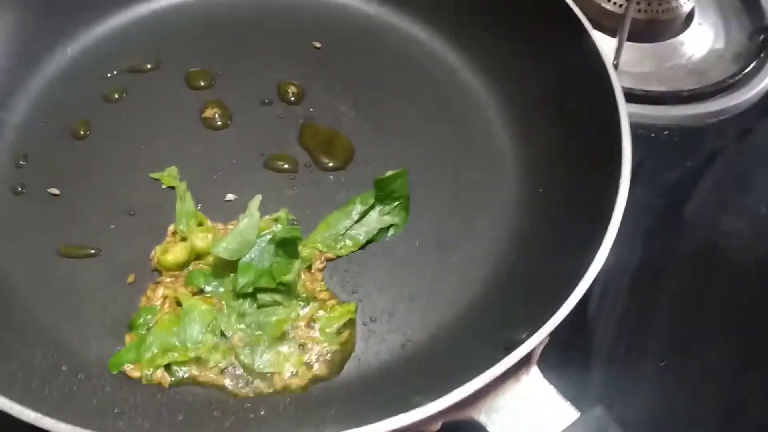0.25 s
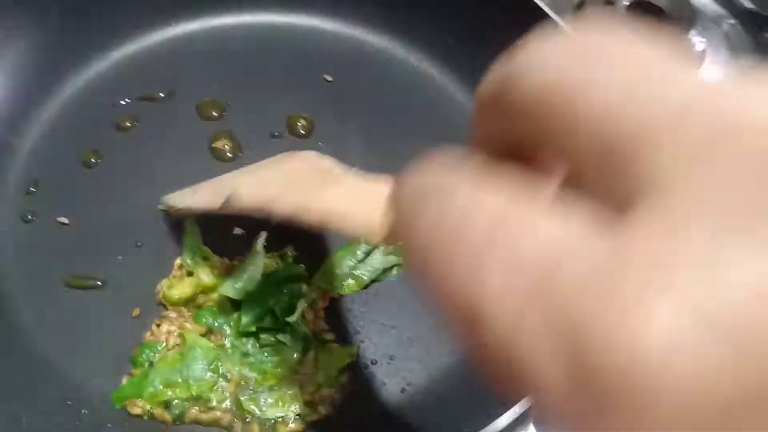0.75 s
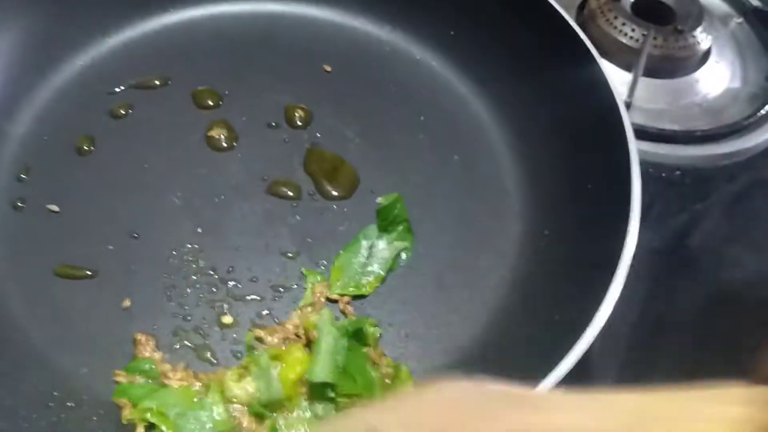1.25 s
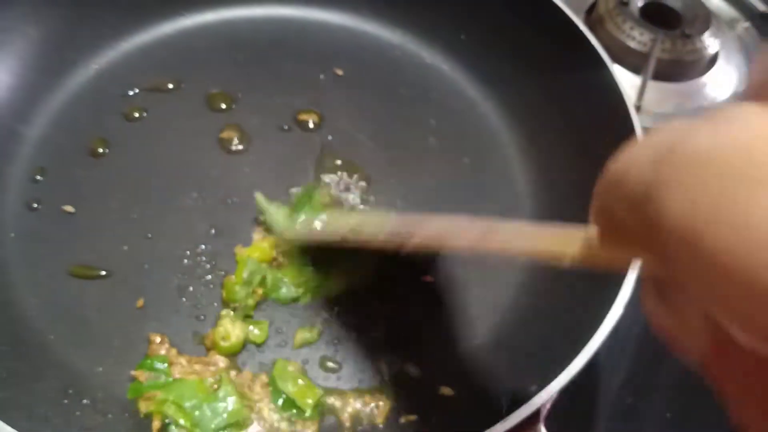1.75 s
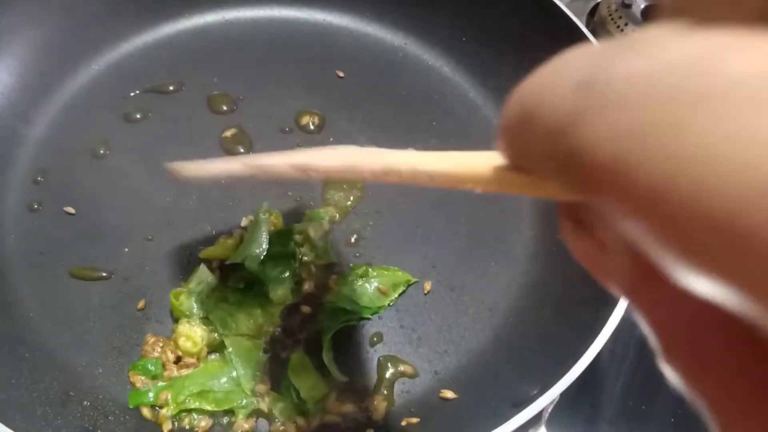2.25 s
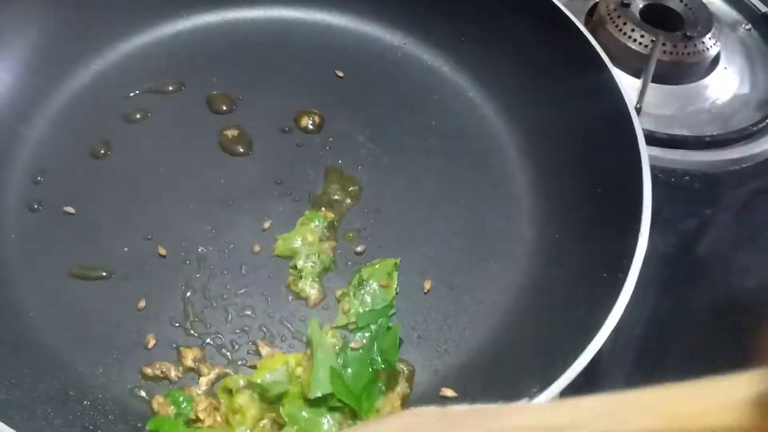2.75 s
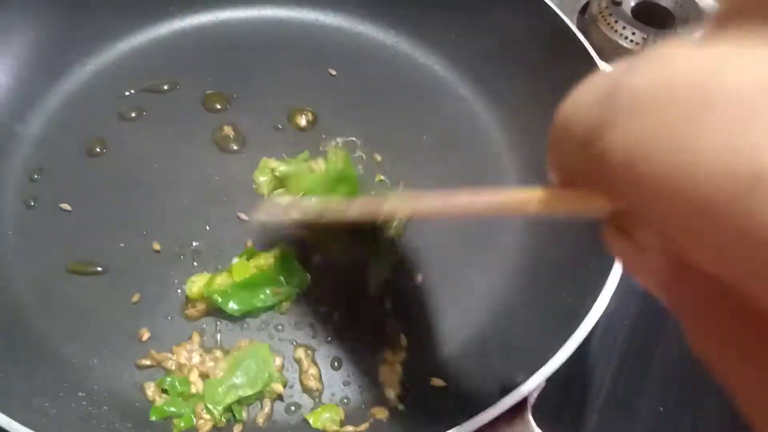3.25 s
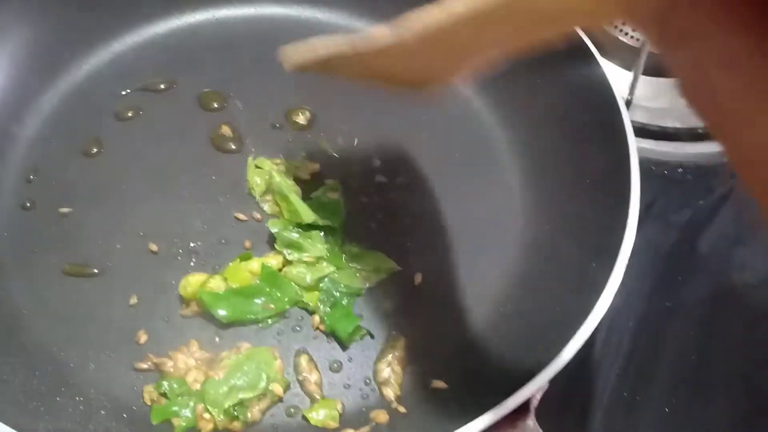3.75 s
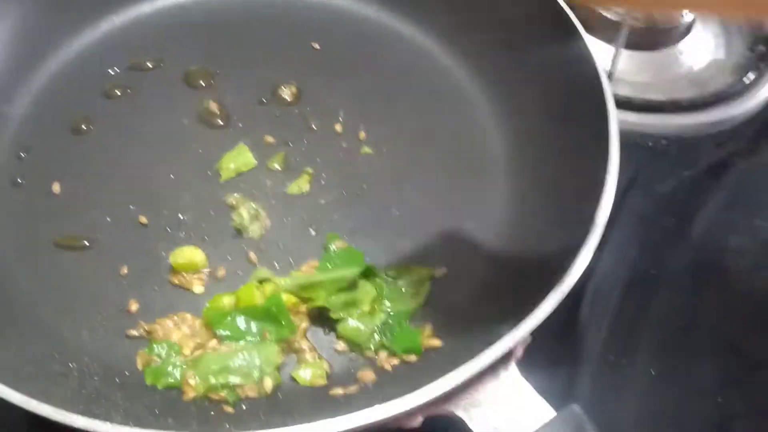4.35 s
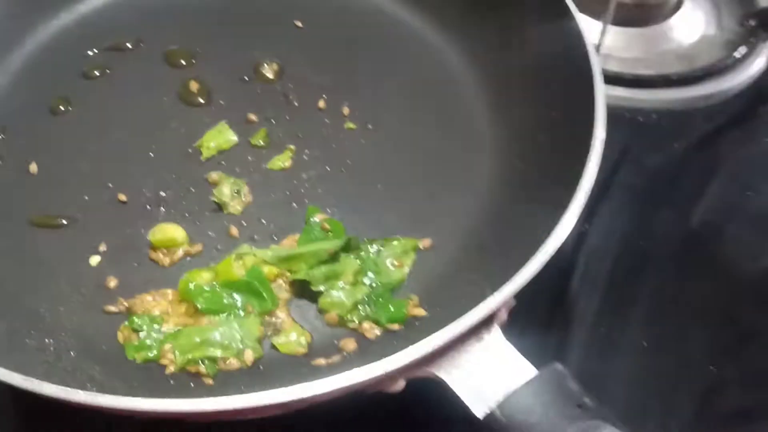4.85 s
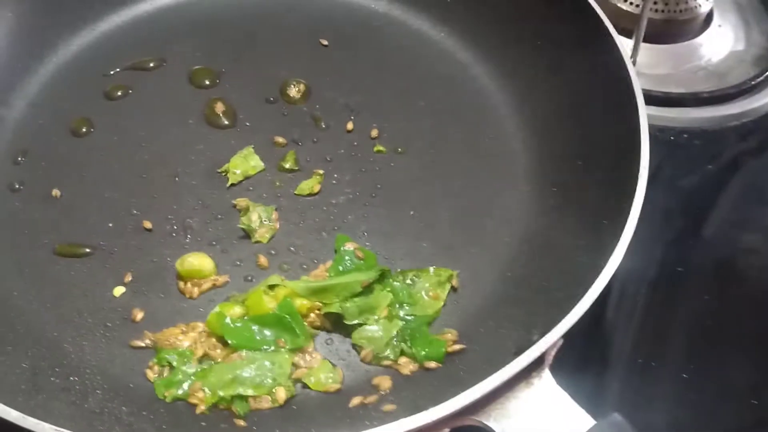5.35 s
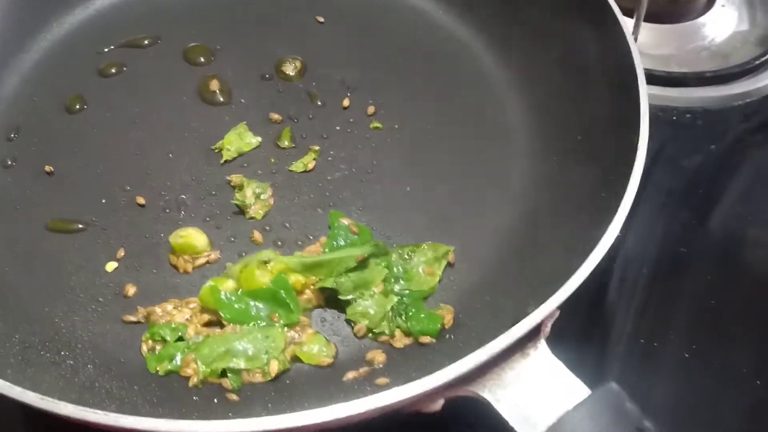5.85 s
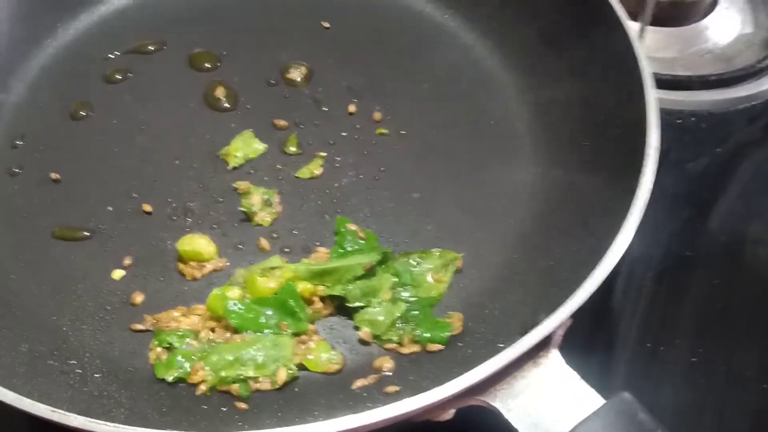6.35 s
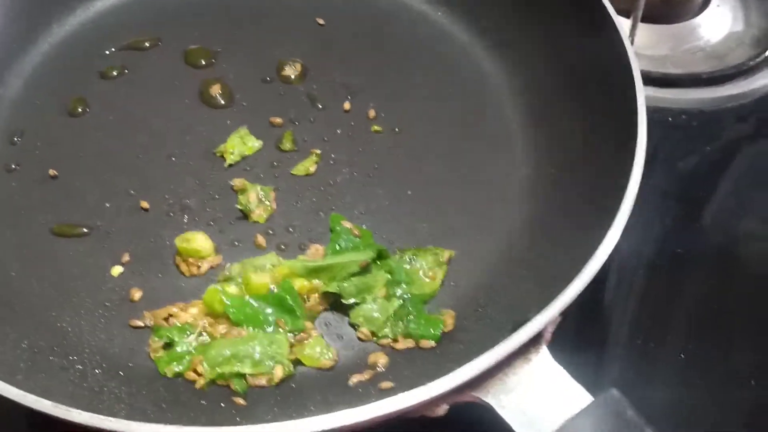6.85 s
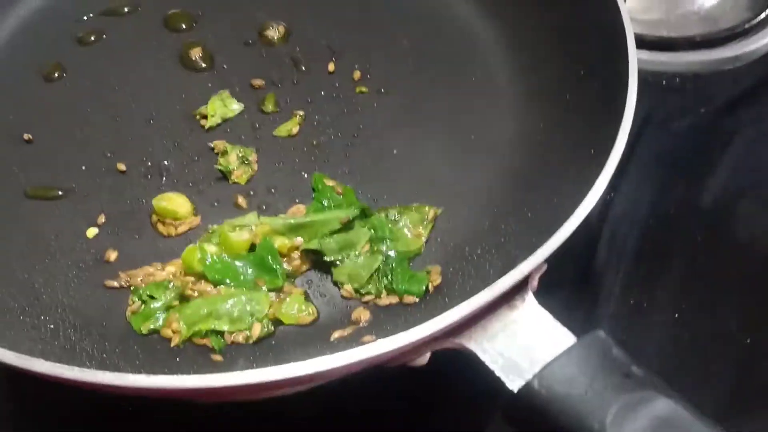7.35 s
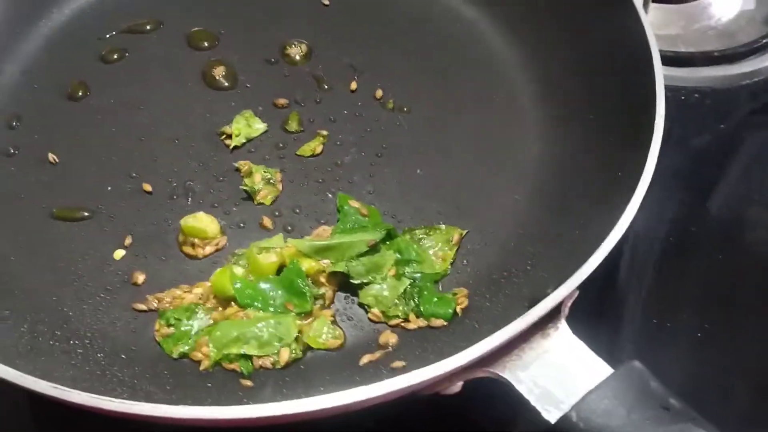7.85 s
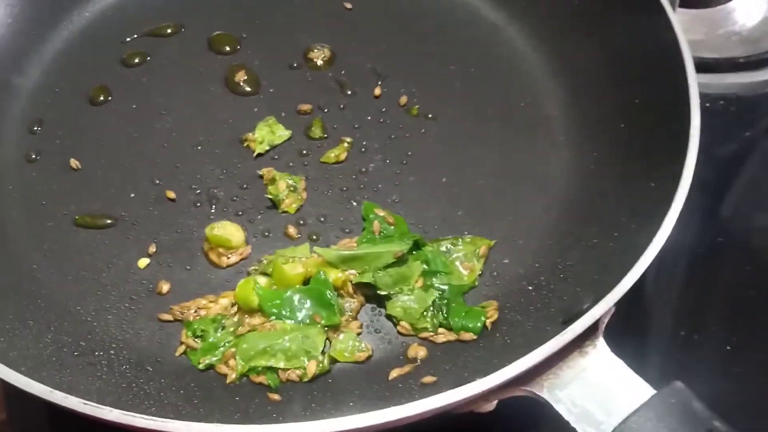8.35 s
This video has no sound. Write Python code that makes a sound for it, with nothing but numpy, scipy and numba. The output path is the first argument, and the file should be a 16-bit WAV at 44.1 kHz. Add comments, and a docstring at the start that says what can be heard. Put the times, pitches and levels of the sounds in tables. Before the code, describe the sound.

Wet leaves and spices fry in a little hot oil, making a dense, crackling sizzle dotted with sharp pops and thin, high spits. The hiss swells in flurries as the food is stirred through the first half, with a few dull little thumps on the left. Then it settles and keeps spluttering. The microphone is close to the pan, with a faint kitchen rumble underneath.

```python
"""A dense, crackling sizzle, close up: wet leaves and spices fry in a little hot oil as a spatula stirs.
Steam bubbles burst by the thousand, in flurries, each a damped oscillation smeared by the pan's bowl.
Bigger bubbles pop and droplets spit, thin and high. Pressure steps thump dully, almost wholly at the
left port of a phone's microphone, and a faint rumble of flame and kitchen lies under it all."""
import sys
import numpy as np
from scipy import signal
from scipy.fft import rfft, irfft
from scipy.io import wavfile
from scipy.ndimage import uniform_filter1d
from numba import njit

SR = 44100
rng = np.random.default_rng(int(sys.argv[2]) if len(sys.argv) > 2 else 0)


def dump(signal):
    """Clip the signal to [-1, 1] and save it as 16-bit WAV at the path in sys.argv[1]."""
    limited = np.clip(np.atleast_2d(signal).T, -1, 1)
    pcm = np.round(limited * 32767).astype(np.int16)
    wavfile.write(sys.argv[1], SR, pcm)


N = 379683

# Level difference between the ports, mostly louder on the left: frequency_hz, left_minus_right_db
PORT_BALANCE = [(60, -14), (110, 4), (200, -0.5), (380, 5), (700, 3), (1290, 3), (2380, 7.5), (4400, 3.5),
                (8120, -0.5), (15000, 7)]


def undb(db):
    """Decibels to amplitude ratio."""
    return 10 ** (np.asarray(db) / 20)


def level(x, db):
    """Scales a signal to an RMS level."""
    return x * undb(db) / np.sqrt(np.mean(x ** 2))


def over_time(rows):
    """Linear interpolation of (time_s, value) points at every sample."""
    return np.interp(np.arange(N) / SR, *np.transpose(rows))


def over_pitch(rows, hz):
    """Interpolation of (frequency_hz, level_db) points on a log-frequency axis."""
    points_hz, db = np.transpose(rows)
    return np.interp(np.log(hz), np.log(points_hz), db)


def flicker(rate_hz):
    """Slow random modulation: Gaussian values, each held for 1 / rate_hz, smoothed twice."""
    hold = int(SR / rate_hz)
    steps = np.repeat(rng.standard_normal(N // hold + 1), hold)
    return uniform_filter1d(uniform_filter1d(steps, hold), hold)[:N]


def minimum_phase(db_at, size=4096):
    """Folding the cepstrum turns a dB response into a causal impulse response."""
    hz = np.maximum(np.arange(size // 2 + 1), 1) * SR / size
    cepstrum = irfft(db_at(hz) * np.log(10) / 20)
    cepstrum[1:size // 2] *= 2
    cepstrum[size // 2 + 1:] = 0
    return irfft(np.exp(rfft(cepstrum)))


@njit
def damped_sines(n, start_sample, cycles_per_sample, decay_cycles, amplitude):
    """Superposed free oscillations, each falling to 1/e in its decay_cycles."""
    out = np.zeros(n)
    for k in range(len(start_sample)):
        pole = cycles_per_sample[k] * (2j * np.pi - 1 / decay_cycles[k])
        first = int(start_sample[k]) + 1
        end = first + int(6 * decay_cycles[k] / cycles_per_sample[k]) + 1
        phasor, step = amplitude[k] * np.exp(pole * (first - start_sample[k])), np.exp(pole)
        for j in range(max(first, 0), min(n, end)):
            out[j] += phasor.imag
            phasor *= step
    return out


def bursts(n, start_s, hz, cycles, amplitude, balance_db, lead_ms=0.05, spread_ms=0.043):
    """Path difference: bursts from scattered spots tend to reach the right port first."""
    lead_s = (lead_ms + spread_ms * rng.standard_normal(len(start_s))) / 1000
    left = damped_sines(n, start_s * SR, hz / SR, cycles, amplitude * undb(balance_db / 2))
    right = damped_sines(n, (start_s - lead_s) * SR, hz / SR, cycles, amplitude * undb(-balance_db / 2))
    return np.array([left, right])


def bowl_scatter(x, tail_db, t60_s=0.065):
    """Scattering in the pan's bowl adds a short diffuse tail, different at each port."""
    t = np.arange(int(0.04 * SR)) / SR
    tail = rng.standard_normal((2, len(t))) * np.exp(-t * np.log(1000) / t60_s) * (t > 0.0003)
    tail /= np.linalg.norm(tail, axis=1, keepdims=True)
    return x + undb(tail_db) * signal.oaconvolve(x, tail, axes=1)[:, :x.shape[1]]


def port_responses():
    """Filters in series add in dB: pan, microphone and port give one impulse response a side."""
    # Colour of pan and microphone: frequency_hz, gain_db
    colour = [(120, -33), (200, -22), (440, -21), (560, -16.5), (980, -13), (1270, -17.5), (1750, -10.5),
              (2250, -4.5), (2950, -4), (3150, -7), (3350, -6.5), (3650, -6.5), (4000, -4), (4400, -6),
              (5900, -2.5), (7600, -14), (9130, -15), (9820, -21), (11400, -11.5), (15000, -5.5),
              (15470, 2.5), (15560, -14), (15800, -11)]
    # Broad resonances of the bowl: centre_hz, width_hz, gain_db
    resonances = [(1706, 390, 4), (5290, 1400, 2)]

    def gain_db(f, side):
        peaks_db = sum(db / (1 + (2 * (f - hz) / width) ** 2) for hz, width, db in resonances)
        return over_pitch(colour, f) + peaks_db + side * over_pitch(PORT_BALANCE, f) / 2
    return np.array([minimum_phase(lambda f: gain_db(f, side)) for side in (1, -1)])


def rumble():
    """Flame and kitchen murmur as low-frequency noise, largely coherent between the ports."""
    # Spectral density of the murmur: frequency_hz, relative_db
    spectrum = [(24, -28), (55, -18), (85, -1), (150, 0), (240, -5), (420, -12), (545, -5), (700, -20),
                (1320, -60)]
    # Slow course of its loudness: time_s, relative_db
    course = [(0.0, -62.5), (8.18, -57), (8.61, -72)]
    response = minimum_phase(lambda f: over_pitch(spectrum, f))
    common, left, right = (signal.oaconvolve(rng.standard_normal(N), response)[:N] for _ in range(3))
    murmur = np.array([common + 0.067 * left, common + 0.18 * right])
    return level(murmur * undb(2.5 * flicker(13)), 1.4) * undb(over_time(course))


def thumps(count=400, size=512):
    """Pressure steps at the left port leak away exponentially; the microphone's low cut swings them back."""
    # The strongest steps: start_s, relative_db, polarity (push +1, pull -1), leak_ms
    strong = [(0.0706, -10, -1, 0.13), (0.215, -15, -1, 0.19), (0.4153, -10, -1, 0.12),
              (0.5064, -8, -1, 0.096), (0.5245, -11.5, -1, 0.31), (0.5368, -13, -1, 0.15),
              (1.23, -8, -1, 0.11), (1.2392, -10, -1, 0.12), (1.3805, -11, 1, 0.49),
              (1.4742, -11, -1, 0.13), (1.6163, -14, -1, 0.15), (1.6398, -5.5, -1, 0.12),
              (1.8503, -1.5, 1, 0.54), (1.8684, -4, -1, 0.45), (1.9436, -17, 1, 0.2),
              (1.9558, -9.5, 1, 0.21), (2.1165, -1, 1, 0.77), (2.2947, -8, -1, 0.12),
              (2.3487, -10, -1, 0.18), (2.3989, -7, -1, 0.27), (2.473, -5, -1, 0.42),
              (2.5474, -14, -1, 0.25), (2.6516, -12, -1, 0.14), (2.697, -16, -1, 0.15),
              (2.8926, -13, -1, 0.15), (2.9178, -9, -1, 0.11), (3.0453, -8, -1, 0.11),
              (3.1986, -7, -1, 0.13), (3.7527, -10.5, 1, 0.39), (3.7719, -16, 1, 0.2),
              (3.7769, -11, 1, 0.2), (3.7853, -15, -1, 0.15), (3.8137, -0.5, -1, 0.71),
              (4.0345, -3, 1, 0.94), (4.0448, -3.5, 1, 0.62), (4.0588, -13, -1, 0.28),
              (3.9336, -13, -1, 0.14), (4.2754, -14, -1, 0.15), (4.4168, -11, -1, 0.098),
              (5.1443, -13, -1, 0.13), (5.1545, -10, -1, 0.079), (5.1738, -9, -1, 0.074),
              (5.5042, -6, -1, 0.089), (5.7596, -11, -1, 0.12), (5.8111, -12, -1, 0.12),
              (6.1816, -11, -1, 0.17), (6.3485, -5, -1, 0.06), (6.358, -7, -1, 0.1),
              (6.4845, -10, -1, 0.16), (6.4917, -14.5, -1, 0.13), (7.2028, -12, -1, 0.15),
              (7.2335, -16, -1, 0.22), (8.119, -2.5, -1, 0.11), (8.2288, -8, -1, 0.1)]
    when, strength, polarity = rng.random((count, 3)).T
    faint_db = -38 + np.minimum(-3.8 * np.log(1 - strength), 12)
    faint = np.transpose([when * (N - size) / SR, faint_db, polarity - 0.8, np.full(count, 0.3)])
    t_ms = np.arange(size) / SR * 1000
    steps = np.zeros(N + size)
    for start_s, db, push, leak_ms in np.vstack([strong, faint]):
        i = int(start_s * SR)
        # quick steps spring back, so they carry less bass
        rebound = np.clip(1.6 - 4.54 * leak_ms, 0, 1) * leak_ms / 1.5 * np.exp(-t_ms / 1.2)
        steps[i:i + size] += np.sign(push) * undb(db) * (np.exp(-t_ms / leak_ms) - rebound)
    dull = signal.sosfilt(signal.butter(2, 3200, fs=SR, output="sos"), steps[:N])
    left = signal.sosfilt(signal.butter(3, 60, "high", fs=SR, output="sos"), dull)
    return left * undb([[0], [-32]])


def spits(count=900, top_hz=14700):
    """Spitting droplets tick: damped oscillations of a few cycles near the upper limit of hearing."""
    # The sharpest spits: start_s, relative_db
    strong = [(0.0697, -24), (0.214, -22), (0.3551, -27), (0.413, -30), (0.5062, -30), (0.5242, -23),
              (0.7776, -30), (0.9732, -27), (1.5748, -27), (2.3476, -23), (2.3974, -24), (2.6055, -26),
              (2.6504, -20), (3.043, -21), (3.0964, -30), (3.1976, -25), (3.8122, -32), (4.0582, -23),
              (4.119, -25), (4.6324, -28), (4.6423, -23), (4.996, -27), (5.1427, -26), (5.1746, -23),
              (5.2769, -24), (5.3577, -23), (5.5014, -22), (5.7583, -26), (6.02, -22), (6.1804, -22),
              (6.349, -16), (6.4835, -20), (6.7935, -29), (6.8508, -24), (6.984, -25), (6.9905, -23),
              (7.1262, -22), (7.1681, -27), (7.2325, -24), (7.4245, -27), (7.889, -25), (8.1179, -22),
              (8.1683, -21), (8.2277, -27), (8.337, -30), (8.3484, -26), (8.3584, -23), (8.514, -29)]
    when, strength, pitch = rng.random((count, 3)).T
    faint_db = -42 + np.minimum(-3.5 * np.log(1 - strength), 9)
    start_s, db = np.vstack([strong, np.transpose([when * N / SR, faint_db])]).T
    hz = top_hz * (1 - 0.048 * rng.random(len(db)))
    ticks = bursts(N, start_s, hz, cycles=np.full(len(db), 3.0), amplitude=undb(db + 8), balance_db=12)
    thin = signal.sosfilt(signal.butter(4, 11000, "high", fs=SR, output="sos"), ticks)
    return bowl_scatter(thin, tail_db=-6, t60_s=0.03)


def pops(fry_db, count=750, size=1024):
    """A large bubble's skin tears with a crack and excites a damped oscillation at the bubble's pitch."""
    # The loudest bursts: start_s, peak_db, pitch_hz, decay_cycles
    strong = [(0.025, -9.5, 1660, 0.2), (0.0706, -13.5, 1800.0, 0.34), (0.2144, -18, 3000, 0.18),
              (0.3113, -14, 3000, 0.6), (0.313, -10, 2900.0, 0.42), (0.3136, -9, 3970, 3.3),
              (0.3562, -9.5, 3000.0, 0.2), (0.3676, -10, 2700.0, 0.38), (0.4358, -15, 2600, 0.55),
              (0.525, -12, 1400.0, 0.15), (0.5494, -11, 4200.0, 1.2), (0.556, -12.5, 2500.0, 0.59),
              (0.7807, -9.5, 2900.0, 0.15), (0.9115, -8, 4300.0, 0.22), (0.9741, -9.5, 1370, 0.24),
              (1.1043, -9, 2800.0, 0.2), (1.1898, -10.5, 6000.0, 0.82), (1.207, -12, 2700.0, 0.82),
              (1.2378, -20.0, 5600.0, 0.65), (1.2391, -8, 4000.0, 0.2), (1.2846, -18, 2500.0, 0.2),
              (1.2905, -12.5, 3400.0, 0.94), (1.4995, -14, 2600.0, 0.35), (1.5758, -13, 1600.0, 0.22),
              (1.6757, -7, 3700.0, 0.52), (1.7149, -11.5, 2550, 1.2), (1.8092, -10.5, 2700.0, 0.18),
              (1.8684, -24, 1400.0, 0.27), (2.1164, -21, 1400.0, 0.25), (2.2897, -10, 3700.0, 0.15),
              (2.2947, -5, 5400.0, 0.29), (2.3484, -12, 1500.0, 0.2), (2.3628, -17.0, 3500.0, 0.45),
              (2.6217, -11.5, 5700.0, 1.4), (2.6516, -16, 1600.0, 0.16), (2.8082, -18, 2400.0, 0.2),
              (2.8336, -16.0, 2800.0, 0.9), (3.1093, -15, 3500.0, 0.45), (3.1409, -14, 3100.0, 0.2),
              (3.1857, -15, 2400.0, 0.49), (3.4138, -6.0, 1900.0, 0.2), (3.5601, -7, 2500.0, 0.13),
              (3.708, -12, 2710, 1.1), (3.7416, -10.5, 2720, 0.65), (3.7656, -11, 3100.0, 0.2),
              (3.9115, -29.5, 760.0, 6.7), (3.953, -17, 2900, 1.0), (4.0089, -22, 2300.0, 0.65),
              (4.0185, -13, 2700.0, 0.9), (4.0342, -26, 1400.0, 0.27), (4.5843, -10.5, 5100.0, 0.14),
              (4.6423, -12, 2980, 0.2), (4.8686, -13.5, 2350, 1), (4.9573, -14, 3100.0, 0.2),
              (4.9981, -12, 6000.0, 0.18), (5.0213, -16, 2300.0, 0.24), (5.1549, -15, 1400.0, 0.19),
              (5.1757, -10, 6000.0, 0.2), (5.2468, -11, 6000.0, 0.2), (5.3587, -12, 3600.0, 0.18),
              (5.5021, -10, 6000.0, 0.65), (5.5659, -11, 5600.0, 1.6), (5.6228, -10.5, 2600, 0.22),
              (5.8108, -11, 6000.0, 1.9), (5.9113, -10, 5400.0, 0.9), (5.9251, -13.5, 2600.0, 0.54),
              (5.9337, -12, 3000.0, 0.3), (5.943, -16, 2900.0, 0.2), (5.9682, -12.5, 2800.0, 0.3),
              (6.1012, -16, 2400.0, 0.2), (6.1032, -13.5, 1900.0, 0.2), (6.2948, -9.5, 3220, 0.78),
              (6.3038, -10, 5800.0, 0.66), (6.3488, -10.5, 1400.0, 0.16), (6.4555, -8, 6040, 1.5),
              (6.489, -9, 2680, 0.6), (6.5982, -5.5, 6000.0, 1.1), (6.5999, -13, 5900.0, 0.25),
              (6.6739, -12, 2200.0, 0.22), (6.7586, -23, 2400.0, 1.2), (6.7636, -11.0, 5200.0, 0.22),
              (6.7805, -16.5, 1800.0, 0.34), (6.8321, -4, 2840, 0.57), (6.9459, -10, 3800.0, 0.2),
              (6.9562, -14, 3200.0, 0.58), (6.9663, -13.5, 2350, 1.1), (6.985, -11, 2100.0, 0.3),
              (7.0482, -12, 5400.0, 0.2), (7.1436, -8.5, 2100.0, 0.25), (7.1832, -12, 6000.0, 1.7),
              (7.284, -10, 5100.0, 0.45), (7.3456, -12, 2700.0, 0.2), (7.4254, -18, 2110, 0.65),
              (7.4957, -11, 3200.0, 0.2), (7.5063, -14, 2000.0, 0.56), (7.565, -14, 2800, 0.33),
              (7.6097, -12, 2600.0, 0.43), (7.619, -2, 3900, 0.5), (7.7796, -9, 2700.0, 0.12),
              (7.8046, -14, 3300.0, 0.52), (7.8163, -13, 3050, 1.2), (7.8289, -7.5, 5500.0, 0.85),
              (7.8945, -14, 2800.0, 0.45), (7.8962, -12, 2500.0, 0.18), (7.9308, -18, 2600, 1.1),
              (7.9488, -8, 5200, 0.5), (7.9682, -11.0, 2900.0, 0.16), (8.0215, -10, 4300.0, 0.26),
              (8.0444, -21, 2000.0, 0.82), (8.119, -23, 2260, 0.43), (8.1339, -10, 5000.0, 0.22),
              (8.2302, -12.5, 2400.0, 0.27), (8.249, -18, 2400.0, 0.72), (8.2607, -9.5, 2720, 0.37),
              (8.3592, -18, 900, 0.24), (8.3831, -12, 1400.0, 0.3), (8.4097, -9.5, 2570, 0.8),
              (8.4931, -11, 4500.0, 0.36)]
    crack_hz, crack_cycles, crack_db = 5200, 0.4, -9
    onset_s = 0.0005
    when, strength, pitch, ring = rng.random((count, 4)).T
    at = size + when * (N - 2 * size)
    lesser_db = fry_db[at.astype(int)] + 10.5 + np.minimum(-2.6 * np.log(1 - strength), 5)
    lesser = np.transpose([at / SR, lesser_db, 1900 * 3.0 ** pitch, 0.13 + 0.4 * ring])
    bubbles = np.vstack([strong, lesser])
    balances_db = 5.2 + 4 * (rng.random(len(bubbles)) - 0.5)  # left minus right
    ports = port_responses()[:, :size]
    soften = signal.butter(2, 9500, fs=SR, output="sos")
    out = np.zeros((2, N + size))
    for (start_s, db, hz, cycles), balance_db in zip(bubbles, balances_db):
        modes = np.transpose([(hz, cycles, 1), (crack_hz, crack_cycles, undb(crack_db))])
        source_balance_db = balance_db - over_pitch(PORT_BALANCE, hz)
        burst = bursts(size, np.full(2, onset_s), *modes, source_balance_db, spread_ms=0.015)
        smeared = signal.sosfilt(soften, bowl_scatter(burst, tail_db=-6))
        pop = signal.fftconvolve(smeared, ports, axes=1)[:, :size]
        i = int((start_s - onset_s) * SR)
        out[:, i:i + size] -= pop * undb(db) / np.abs(pop).max(axis=1).mean()
    return out[:, :N]


def stirring(start, stirred, settled):
    """Piecewise-linear course of a value as stirring builds up, stops, and the heap settles near the rim."""
    full_s, stop_s, settle_s = 1.3, 4.24, 0.97
    return over_time([(0, start), (full_s, stirred), (stop_s, stirred), (stop_s + settle_s, settled)])


def sizzle(fry_db, count=30000, spots=6):
    """Shot noise: countless steam bubbles burst at random, the smaller the higher, swelling in flurries."""
    # The bowl's main resonance surges with the spatula's strokes: time_s, gain_db
    ring_gain = [(0, -6), (.9, 3), (1.15, -1), (1.4, -12), (1.72, 5), (1.9, -1), (2.5, 5), (2.9, 2.5),
                 (3.35, 3.5), (3.6, -0.5), (3.76, 3), (3.85, 1), (4.05, 1), (4.3, 1), (5, -0.5), (8.61, -7)]
    # Borders between big, medium, small and finest bubbles: pitch_hz
    borders = [1380, 3860, 9980]
    spread_db, flicker_db = [3.05, 4.2, 3.18, 1.64], [3.4, 0.19, 0.77, 0.9]  # big to finest
    low_hz, high_hz, ring_hz, ring_width_hz = 350, 17000, 2660, 105
    lead_ms = stirring(0.075, 0.08, 0.12)
    flurry_db = 0.3 * flicker(14) + 1.2 * flicker(40) + 0.41 * flicker(200)
    size_db = np.array([stirring(-3, 2.5, -4.5), np.zeros(N), stirring(1, 2.14, 2), stirring(-3.5, 0, -1.5)])
    size_db -= size_db.mean(axis=1, keepdims=True)
    size_db += np.array([db * flicker(22) for db in flicker_db])
    hiss = np.zeros((2, N))
    for _ in range(spots):
        when, pitch, strength, ring, side = rng.random((count, 5)).T
        at = (when * (N - 1)).astype(int)
        hz = low_hz * (high_hz / low_hz) ** pitch
        kind = np.searchsorted(borders, hz)
        excess_db = np.minimum(-np.take(spread_db, kind) * np.log(1 - strength), 21)  # a few stand out
        amplitude = hz * undb(excess_db + flurry_db[at] + size_db[kind, at])
        cycles = 0.58 + 1.74 * ring ** 2
        bubbles = bursts(N, at / SR, hz, cycles, amplitude, balance_db=2 * side - 1, lead_ms=lead_ms[at])
        hiss += bowl_scatter(bubbles, tail_db=-1.5)
    hiss = signal.oaconvolve(hiss, port_responses(), axes=1)[:, :N]
    resonance = signal.lfilter(*signal.iirpeak(ring_hz, ring_hz / ring_width_hz, SR), hiss)
    return level(hiss + undb(over_time(ring_gain)) * resonance, 4.38) * undb(fry_db)


def scene():
    """The sources superpose; the sizzle and the lesser pops follow one loudness contour."""
    # Vigour of the frying: time_s, relative_db
    vigour = [(0.0, -33.0), (0.214, -34.5), (0.243, -36), (0.271, -35), (0.321, -32.0), (0.409, -36),
              (0.463, -34), (0.489, -36), (0.519, -35), (0.664, -36), (0.894, -35), (1.02, -29),
              (1.137, -33.5), (1.253, -30.5), (1.421, -33.5), (1.672, -28.5), (1.88, -34), (1.956, -32),
              (2.019, -34.5), (2.127, -32.5), (2.247, -37), (2.355, -33.5), (2.452, -36), (2.778, -33),
              (3.291, -30.5), (3.398, -33.0), (3.72, -28.5), (3.789, -29), (3.797, -39.5), (3.86, -33.5),
              (3.9, -34), (4.075, -30.5), (4.324, -37), (4.382, -34.5), (4.731, -37.5), (4.763, -36),
              (4.845, -35.5), (4.955, -33.5), (5.047, -36), (5.16, -31.5), (5.198, -34.5), (5.38, -35.5),
              (5.623, -31), (5.741, -34.5), (5.775, -30.0), (5.861, -34.5), (5.933, -32), (6.076, -34.5),
              (6.114, -30), (6.158, -33.5), (6.192, -29.5), (6.268, -33.5), (6.306, -31.5), (6.495, -31.5),
              (6.577, -30.5), (6.761, -30.5), (7.074, -33), (7.184, -31.5), (7.319, -33), (7.495, -33),
              (7.545, -35.0), (7.625, -32.5), (7.756, -33.5), (7.822, -35), (7.862, -34), (7.974, -30.5),
              (8.102, -35), (8.247, -33), (8.45, -35.5), (8.56, -38), (8.608, -33)]
    fry_db = over_time(vigour)
    return sizzle(fry_db) + pops(fry_db) + thumps() + spits() + rumble()


def record(dry):
    """Band limiting and soft saturation: the phone cuts the lowest bass, rounds peaks and cuts the top."""
    low_hz, top_hz, ceiling = 12, 15780, 0.9
    trimmed = signal.sosfilt(signal.butter(1, low_hz, "high", fs=SR, output="sos"), dry)
    rounded = trimmed / (1 + (trimmed / ceiling) ** 6) ** (1 / 6)
    return signal.sosfilt(signal.ellip(12, 0.2, 85, top_hz, fs=SR, output="sos"), rounded)


dry = scene()
out = record(dry)
dump(out)
```